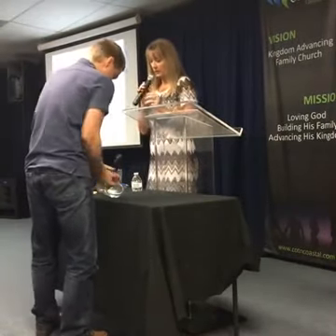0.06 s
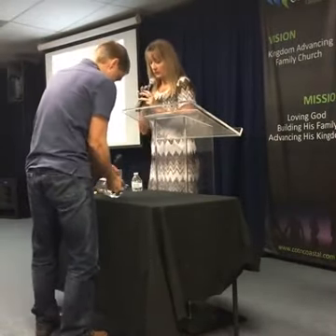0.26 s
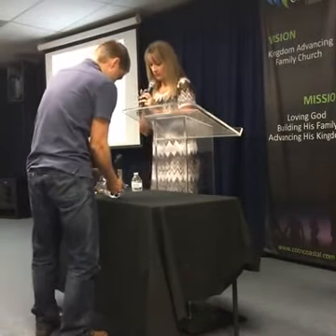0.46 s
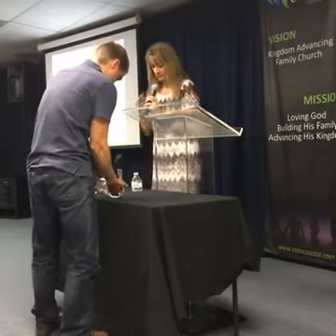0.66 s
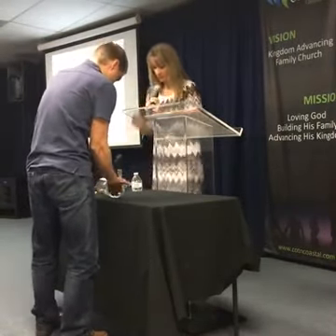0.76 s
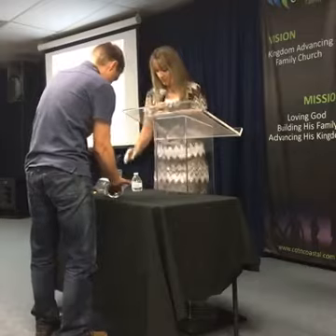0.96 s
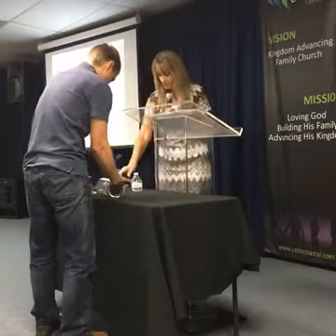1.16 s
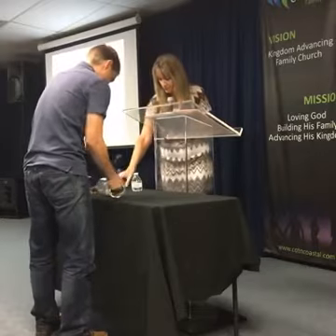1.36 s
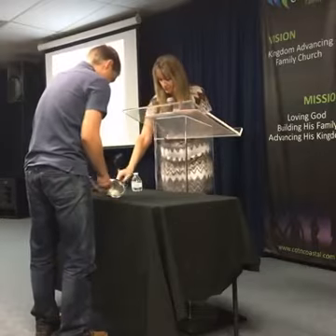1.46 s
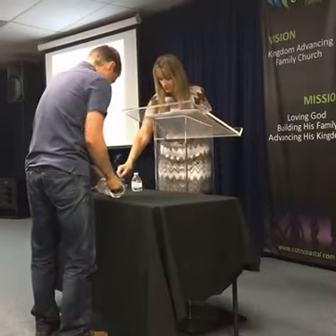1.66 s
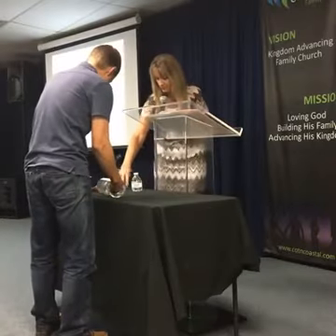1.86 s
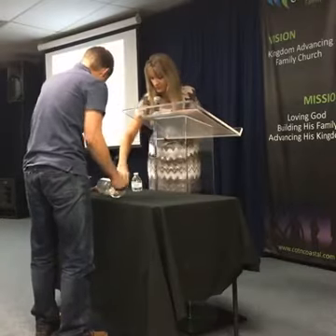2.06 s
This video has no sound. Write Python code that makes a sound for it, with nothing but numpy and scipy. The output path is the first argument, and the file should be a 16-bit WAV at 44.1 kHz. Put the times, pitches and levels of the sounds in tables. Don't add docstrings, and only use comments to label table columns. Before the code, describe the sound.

Stones pour into a glass jar with sharp, bright clinks and gritty rattling, after nearly a second of faint brushing and dry stone clicks; heard from some metres away in a hall with low ventilation rumble.

```python
import sys
import numpy as np
from scipy import signal
from scipy.fft import rfft, irfft
from scipy.io import wavfile
from scipy.ndimage import uniform_filter1d

SR = 44100
rng = np.random.default_rng(int(sys.argv[2]) if len(sys.argv) > 2 else 0)


def store_pcm(level_fs):
    pcm = np.round(np.clip(level_fs, -1, 1) * 32767).astype(np.int16)
    wavfile.write(sys.argv[1], SR, np.atleast_2d(pcm).T)


def magnitude_from_level(level_db):
    exponent = np.asarray(level_db, float) / 20
    return 10 ** exponent


N = 92786

# frequency in Hz, density in dB per Hz.
AIR = [(15, -29), (25, 7), (81, 3), (237, -15), (354, -20), (528, -23.5), (1720, -30.5), (2360, -33.5),
       (15000, -47)]
# frequency in Hz, rms level in dB, wobble in dB.
HUM = [
    (59.9, -61.5, 8),
    (117.5, -61, 7),
]
# centre in seconds, length in seconds, pitch in Hz, level in dB.
TABLE_GROANS = [(0.356, 0.05, 202, -64), (0.883, 0.028, 196, -57), (0.973, 0.047, 230, -59),
                (1.19, 0.068, 176, -58.5), (1.242, 0.051, 204, -57.5), (1.54, 0.12, 214, -64),
                (1.894, .1, 180, -61)]
# centre in seconds, pitch in Hz, level in dB.
BRUSHES = [(.05, 3720, -72), (0.133, 4630, -67.5), (.22, 4860, -71), (.25, 8900, -73), (0.496, 4240, -72),
           (.52, 3570, -79), (0.549, 4200, -72), (0.864, 5500, -66.5)]
# start in seconds, peak in dB, pitch in Hz.
TICKS = [(0.133, -55, 4380), (0.216, -62, 5400), (0.372, -55, 3430), (0.479, -33, 4070),
         (.479, -47.5, 6500), (0.51, -38.5, 3560), (0.526, -41, 3470), (0.543, -51, 3620),
         (.696, -50.5, 3760), (.7205, -26.5, 1520), (0.723, -34.5, 2300), (0.812, -40.5, 4000),
         (0.847, -38.5, 5130)]
# start in seconds, peak in dB,
# then low, middle and high ring in dB relative to the peak.
FIRST_POUR = [(0.7191, -23.5, -7, -10.5, -41), (0.8889, -7.5, -11.5, -2.5, -3), (0.9121, -14, -3.5, -12, 4),
              (0.9484, -12, -16, 0.5, -33), (0.957, -19.5, -47, -3.5, 3), (0.9906, -16.5, -38, -30, -37),
              (1.0231, -19.5, -12, -1.5, -17), (1.0503, -19, -53, -34, -24), (1.0776, -21, -15, -51, -10),
              (1.0904, -16.5, -43, -9, -9), (1.1278, -17, -25, -29, -31), (1.1416, -18, 0, -38, -43),
              (1.1511, -12.5, -26, -6, -22), (1.1831, -11, -46, -7.5, -8.5), (1.1945, -19.5, 0.5, -43, 4),
              (1.2109, -9.5, -50, -28, -10), (1.2434, -18, -3.5, -33, -9), (1.2779, -21, 2, -34, 0),
              (1.3028, -14.5, -14.5, -38, -12), (1.368, -24.5, -19, -4, -4.5)]
# start in seconds, peak in dB, low, middle and high ring in dB.
LATER_POURS = [(1.4422, -20.5, -12.5, -35, -8.5), (1.4636, -14, -28, -13, -0.5),
               (1.495, -19, -31, -42, -4.5), (1.5257, -19.5, -45, -28, -8), (1.5419, -25.5, -50, -6, 4),
               (1.598, -26.5, -19, -8.5, -32), (1.7555, -29, -19, -11, -10), (1.7718, -19.5, -6, -10, -3.5),
               (1.8074, -29, -2, -3, -0.5), (1.8439, -13.5, -9, -8, -3), (1.8877, -19, -6, -4, -2),
               (1.9297, -22.5, -17, -11, -42), (1.9754, -21, -13, -15, -31), (1.9868, -18, -24, -15, -31),
               (2.0348, -19, -8, -39, -28)]
# time in seconds, rattle level in dB.
RATTLE = [(0.884, -58), (.95, -30.5), (1.0, -34), (1.08, -34.5), (1.14, -27), (1.22, -27.5), (1.31, -31.5),
          (1.36, -37), (1.43, -39), (1.468, -30), (1.56, -38.5), (1.63, -48), (1.67, -61.5), (1.751, -54),
          (1.77, -37), (1.9, -32), (2.042, -36.5), (2.1, -64)]
# frequency in Hz, level in dB, T60 in seconds.
JAR = [(1599, -5.5, 0.14), (2989, -9.5, 0.21), (3983, -4, 0.15), (5064, -1.5, 0.061), (5435, -7, 0.14),
       (6720, -7.5, 0.13), (7030, -3.5, 0.085), (7460, -25, 0.037), (8345, -12.5, 0.1), (8506, -12, 0.065),
       (8840, -20.5, 0.14), (9980, -29.5, 0.15), (10980, -20, 0.11), (13000, -39, .05)]
RING_HZ = (1600, 4000, 5200, 7000)
# frequency in Hz, density in dB per Hz.
CRACK = [(200, -17.5), (700, -26), (1600, -11.5), (2500, -9.5), (4500, 5.5), (8800, -6.5), (9300, -17),
         (15000, -13)]
# frequency in Hz, gain in dB.
MIC = [(5, -40), (32, -18), (42, 2.5), (9000, 1.5), (12000, -0.5), (14500, -28), (16000, -45), (22000, -40)]

AIR_DB = -52.5
TICK_S, TICK_WIDTH, BRUSH_S = 0.0045, 0.53, 0.017
RATTLE_COUNT, RATTLE_SPREAD_DB, RATTLE_GAIN_DB = 900, 2.5, -16.5
TWIN_SPLIT, TWIN_DB, TWIN_LONGER = 0.00804, -9.5, 2.38
RING_DB, SCATTER_DB, RISE_T60_S = -6.5, 1.5, 0.007
FLUTTER_RAD, FLUTTER_RATE_HZ, FLICKER_DB, FLICKER_RATE_HZ = 1.03, 61.7, 2.5, 90
CRACK_DB, CRACK_S, RATTLE_CRACK_DB = -16, 0.0026, -6
GRIND_DB, GRIND_S, BRIGHT_HZ = -10, 0.014, 5560
TABLE_DB, TABLE_T60_S = -5.5, 0.069
HALL_DB, HALL_T60_S, HALL_GAP_S, HALL_HZ = -6, 0.15, 0.013, 6640
RING_WET = 0.3
LAST_POUR_S, MUFFLE_HZ, MUFFLE = 1.6, 9950, 0.51
SQUASH = 1.6


def colour(x, points):
    p = np.array(points)
    hz = np.maximum(np.arange(len(x) // 2 + 1) * SR / len(x), 1)
    gain_db = np.interp(np.log(hz), np.log(p[:, 0]), p[:, 1], left=-60)
    return irfft(rfft(x) * magnitude_from_level(gain_db), len(x))


def unit(x):
    return x / np.sqrt(np.mean(x ** 2))


def walk(rate):
    k = int(SR / rate)
    return unit(uniform_filter1d(uniform_filter1d(rng.standard_normal(N), k), k))


def band(x, hz, width):
    edges = [hz / (1 + width / 2), hz * (1 + width / 2)]
    return signal.sosfilt(signal.butter(2, edges, "band", fs=SR, output="sos"), x)


def spikes(times, sizes):
    return np.bincount(np.clip((times * SR).astype(int), 0, N - 1), sizes, N)


def fade(x, hz, t60):
    pole = np.exp(2j * np.pi * hz / SR - np.log(1000) / (t60 * SR))
    return signal.lfilter([1], [1, -pole], x)


def air():
    t = np.arange(N) / SR
    out = magnitude_from_level(AIR_DB) * unit(colour(rng.standard_normal(N), AIR))
    for hz, db, wobble_db in HUM:
        level = np.sqrt(2) * magnitude_from_level(db + wobble_db * walk(8.6))
        out = out + level * np.sin(2 * np.pi * hz * t + 0.32 * walk(3.1))
    return out


def swell(noise, centre, length, hz, width, db):
    t = np.arange(N) / SR
    return magnitude_from_level(db) * np.exp(-0.5 * ((t - centre) / length) ** 2) * unit(band(noise, hz, width))


def table_groans():
    noise = rng.standard_normal(N)
    return sum(swell(noise, s, length, hz, 0.14, db) for s, length, hz, db in TABLE_GROANS)


def hand_brushes():
    noise = rng.standard_normal(N)
    return sum(swell(noise, s, BRUSH_S, hz, 0.93, db) for s, hz, db in BRUSHES)


def hand_ticks():
    t, noise, out = np.arange(N) / SR, rng.standard_normal(N), 0
    for s, db, hz in TICKS:
        burst = (t >= s) * np.exp(-np.abs(t - s) / TICK_S) * noise
        out = out + magnitude_from_level(db + 0.5) * band(burst, hz, TICK_WIDTH)
    return out


def pebbles():
    curve = np.array(RATTLE)
    when = rng.uniform(curve[0, 0], curve[-1, 0], RATTLE_COUNT)
    spread_db = -RATTLE_SPREAD_DB * np.log(0.047 + rng.random(RATTLE_COUNT))
    return when, magnitude_from_level(np.interp(when, *curve.T) + RATTLE_GAIN_DB + spread_db)


def ring(push, hz, t60):
    flicker = magnitude_from_level(FLICKER_DB * walk(FLICKER_RATE_HZ))
    shake = flicker * np.exp(1j * FLUTTER_RAD * walk(FLUTTER_RATE_HZ))
    swelled = fade(push, hz, RISE_T60_S) * np.log(1000) / (RISE_T60_S * SR)
    return (fade(swelled, hz, t60) * shake).imag


def jar_rings(hits, when, size):
    out = 0
    for k, (hz, db, t60) in enumerate(JAR):
        rel_db = np.array([np.interp(hz, RING_HZ, (low, -6, mid, high)) for low, mid, high in hits[:, 2:]])
        for twin in (0, 1):
            scatter_db = SCATTER_DB * rng.standard_normal(len(hits))
            strong = magnitude_from_level(hits[:, 1] + rel_db + RING_DB + scatter_db) * rng.choice([-1, 1], len(hits))
            weak = size * np.cos(2 * np.pi * rng.random(len(size)))
            push = spikes(hits[:, 0], strong) + spikes(when, weak) + 1e-18
            pitch = hz * (1 + TWIN_SPLIT * twin * (-1) ** k)
            out = out + magnitude_from_level(db + TWIN_DB * twin) * ring(push, pitch, t60 * TWIN_LONGER ** twin)
    return out


def jar_cracks(hits, when, size):
    noise, out = rng.standard_normal(N), 0
    for kind, bright_db in (("low", 0), ("high", hits[:, -1] + 6)):
        stones = spikes(hits[:, 0], magnitude_from_level(hits[:, 1] + bright_db + CRACK_DB))
        push = stones + spikes(when, size * magnitude_from_level(RATTLE_CRACK_DB))
        shape = (fade(push, 0, 7 * CRACK_S) + magnitude_from_level(GRIND_DB) * fade(push, 0, 7 * GRIND_S)).real
        part = signal.lfilter(*signal.butter(2, BRIGHT_HZ, kind, fs=SR), shape * noise)
        out = out + colour(part, CRACK)
    return out / np.std(colour(noise, CRACK))


def jar():
    hits = np.array(FIRST_POUR + LATER_POURS)
    when, size = pebbles()
    return jar_rings(hits, when, size), jar_cracks(hits, when, size)


def tail(t60):
    t = np.arange(SR // 2) / SR
    return rng.standard_normal(len(t)) * magnitude_from_level(-60 * t / t60) * np.sqrt(2 * np.log(1000) / t60 / SR)


def hall(x):
    late = tail(HALL_T60_S) * (np.arange(SR // 2) / SR > HALL_GAP_S)
    late = signal.lfilter(*signal.butter(1, HALL_HZ, fs=SR), late)
    echo = magnitude_from_level(TABLE_DB) * tail(TABLE_T60_S) + magnitude_from_level(HALL_DB) * late
    return x + signal.fftconvolve(x, echo)[:N]


def muffle(x):
    top = signal.sosfiltfilt(signal.butter(4, MUFFLE_HZ, "high", fs=SR, output="sos"), x)
    return x - MUFFLE * top * (np.arange(N) > LAST_POUR_S * SR)


def scene():
    rings, cracks = jar()
    handling = hand_ticks() + hand_brushes() + table_groans()
    near = (1 - RING_WET) * rings + hall(RING_WET * rings + cracks + handling)
    return (muffle(near) + air())[None]


def band_limit(x):
    return signal.sosfilt(signal.butter(12, 15140, fs=SR, output="sos"), x)


def record(dry):
    rounded = np.tanh(SQUASH * dry[0]) / SQUASH
    return band_limit(colour(rounded, MIC)[None])


dry = scene()
out = record(dry)
store_pcm(out)
```